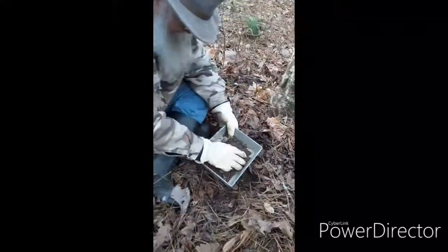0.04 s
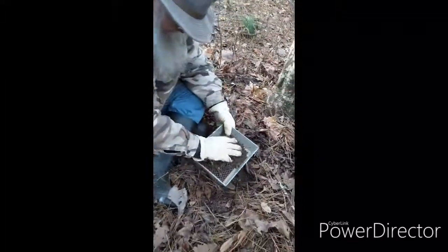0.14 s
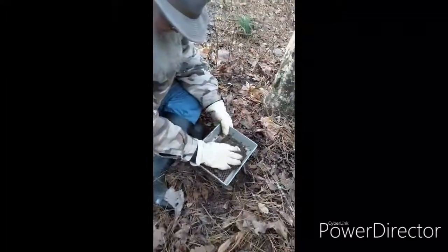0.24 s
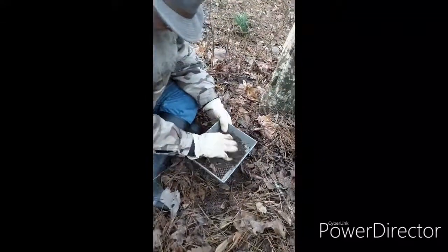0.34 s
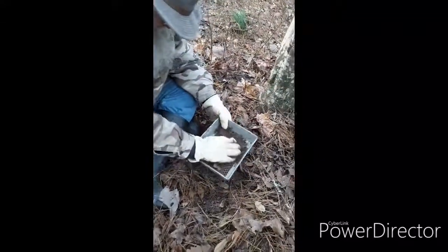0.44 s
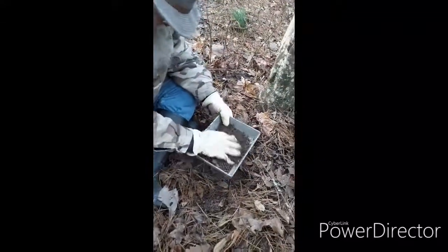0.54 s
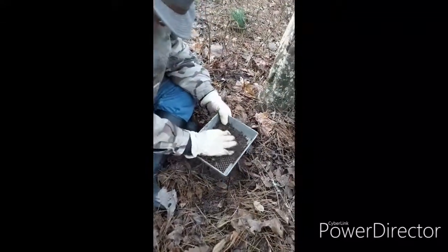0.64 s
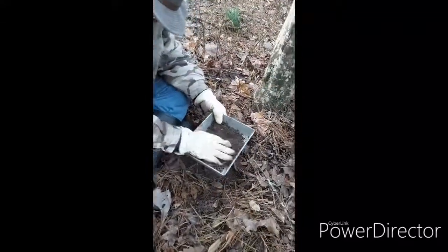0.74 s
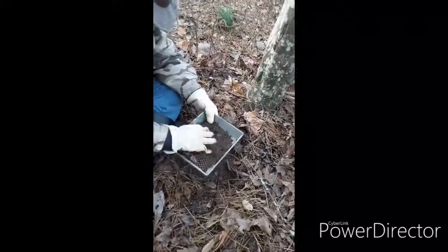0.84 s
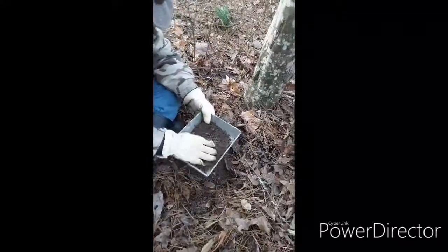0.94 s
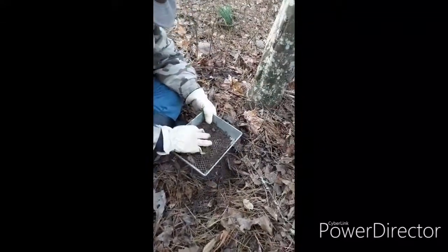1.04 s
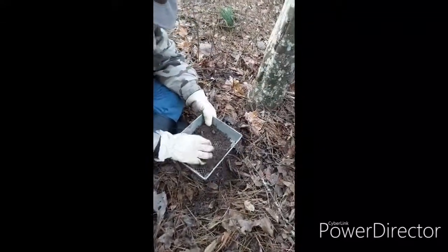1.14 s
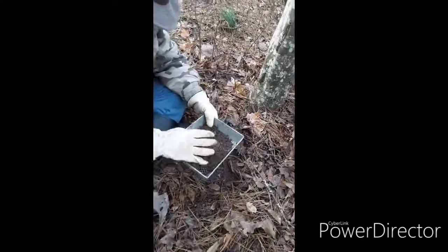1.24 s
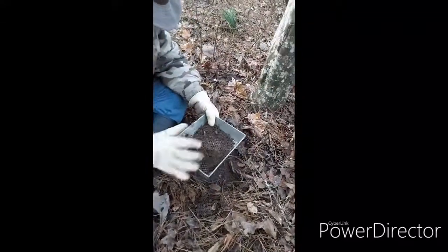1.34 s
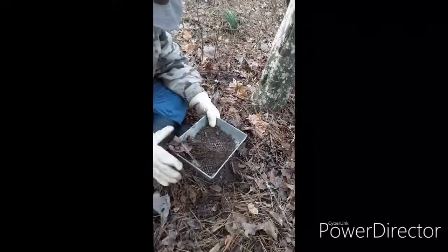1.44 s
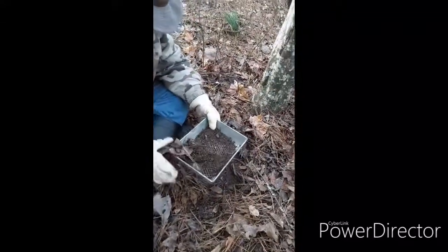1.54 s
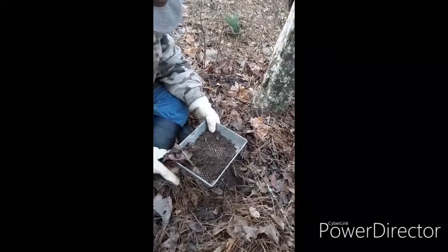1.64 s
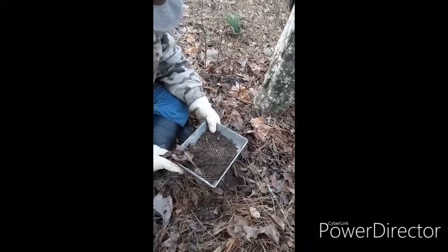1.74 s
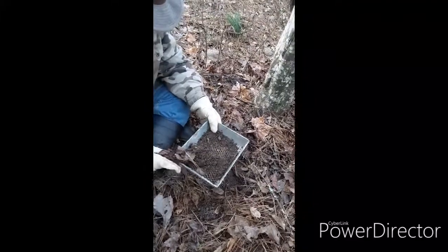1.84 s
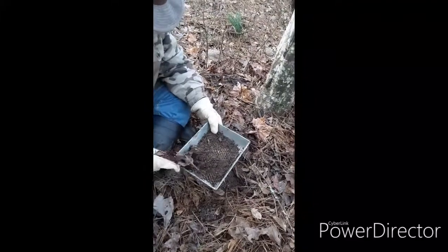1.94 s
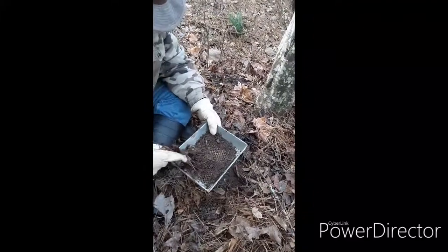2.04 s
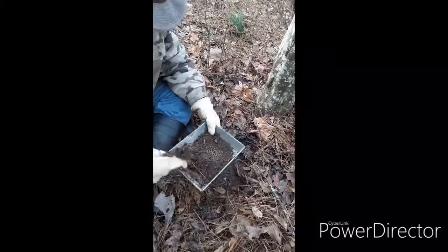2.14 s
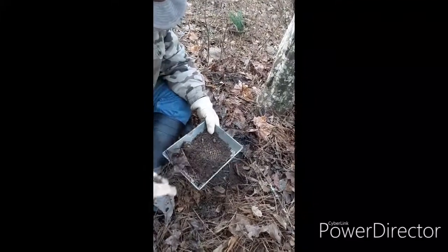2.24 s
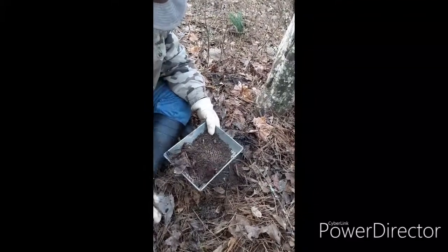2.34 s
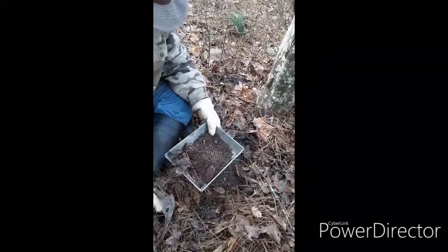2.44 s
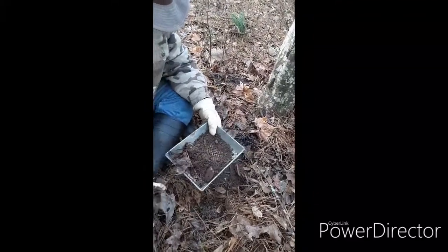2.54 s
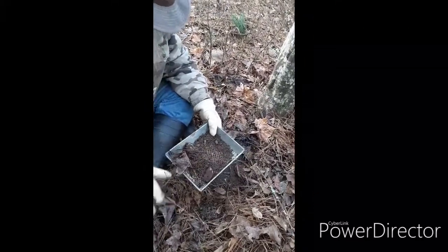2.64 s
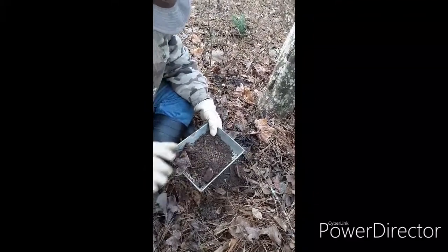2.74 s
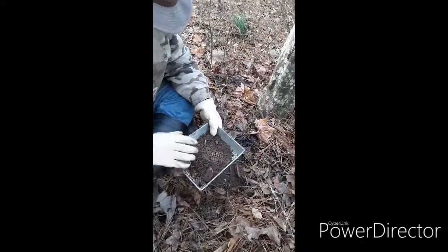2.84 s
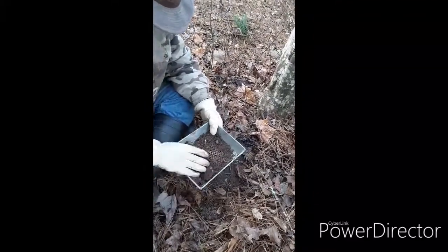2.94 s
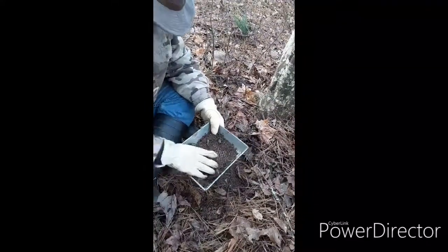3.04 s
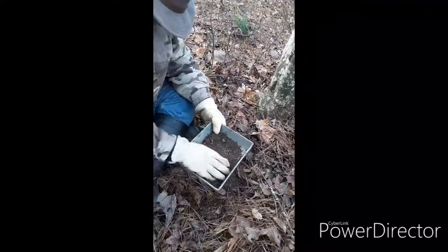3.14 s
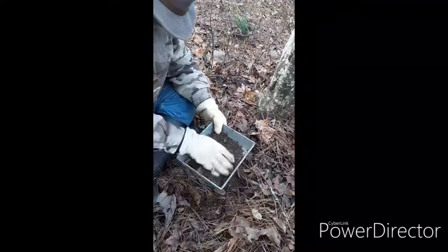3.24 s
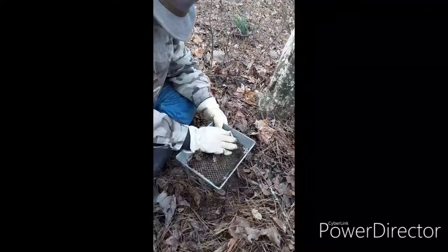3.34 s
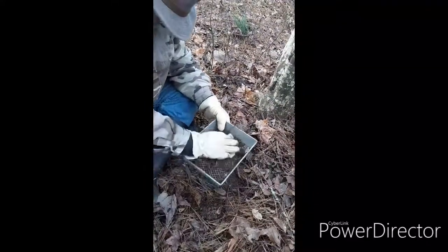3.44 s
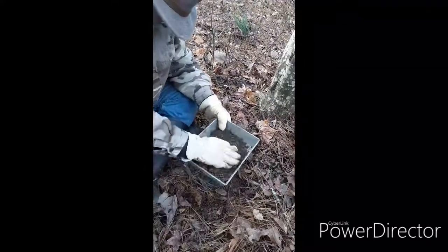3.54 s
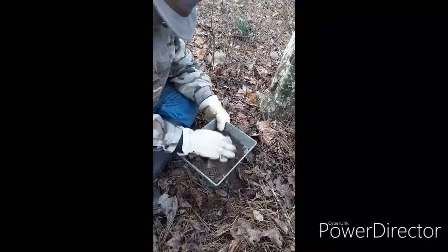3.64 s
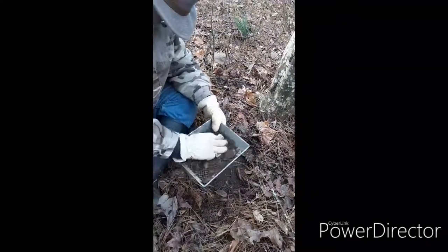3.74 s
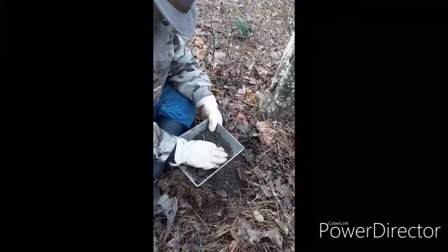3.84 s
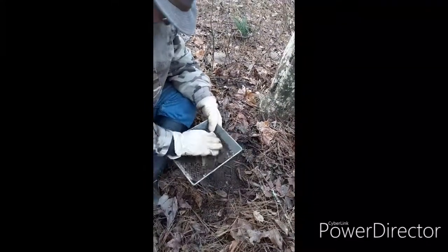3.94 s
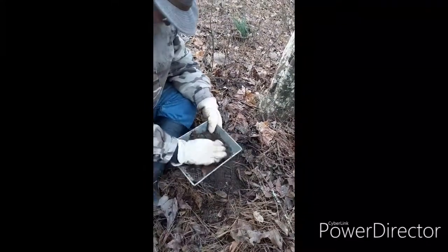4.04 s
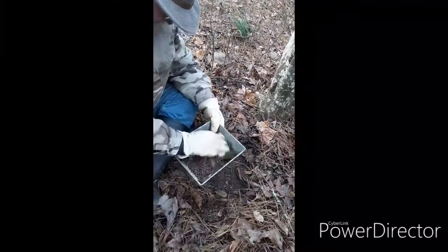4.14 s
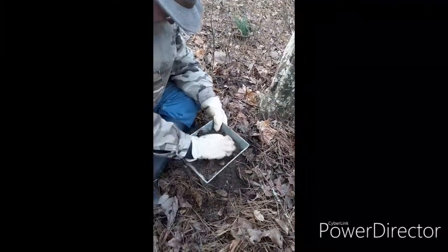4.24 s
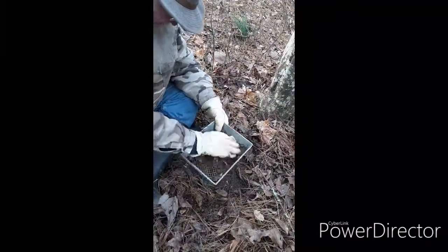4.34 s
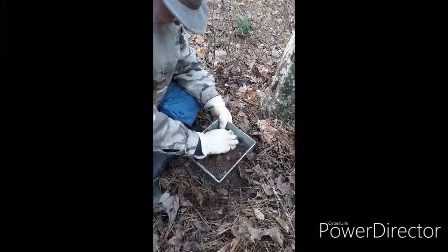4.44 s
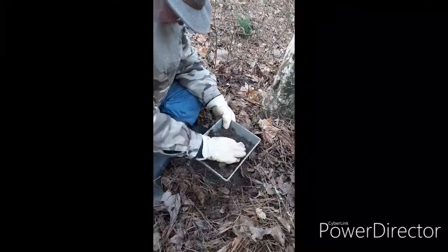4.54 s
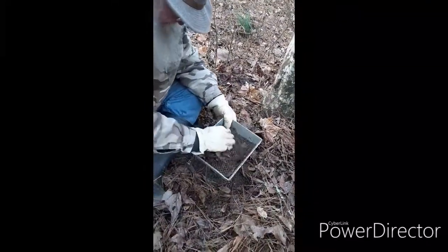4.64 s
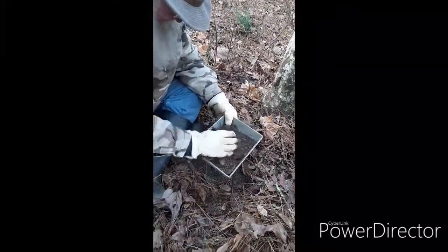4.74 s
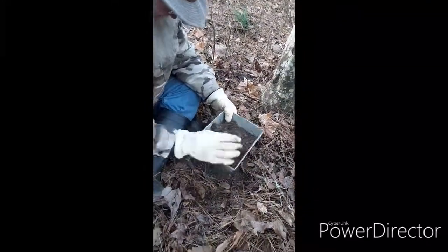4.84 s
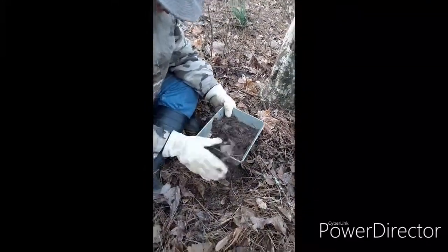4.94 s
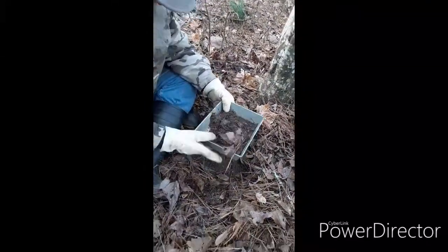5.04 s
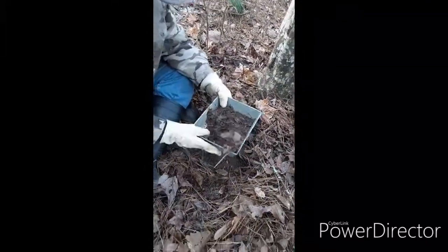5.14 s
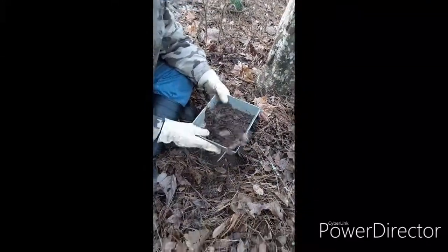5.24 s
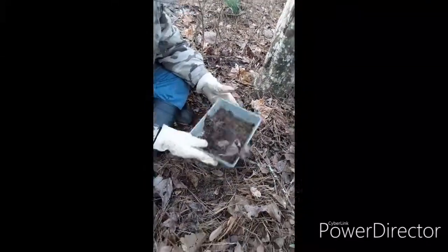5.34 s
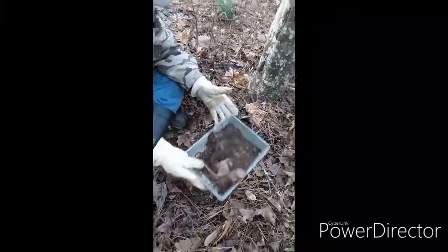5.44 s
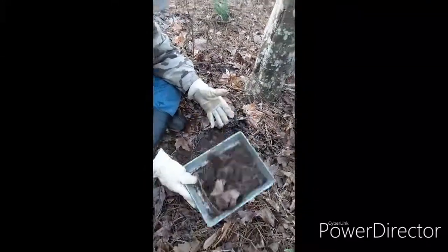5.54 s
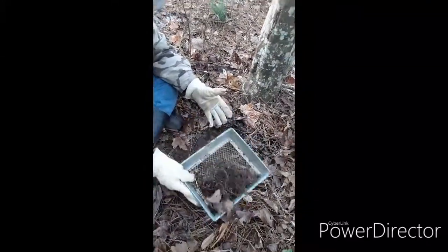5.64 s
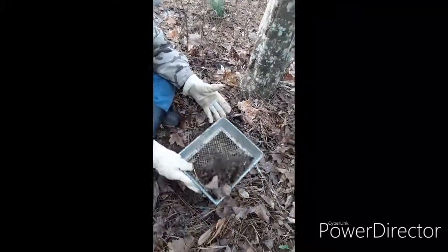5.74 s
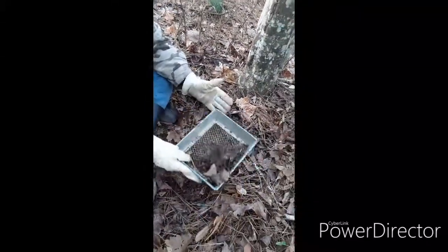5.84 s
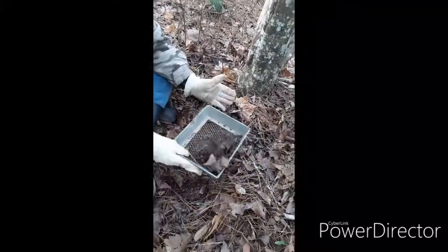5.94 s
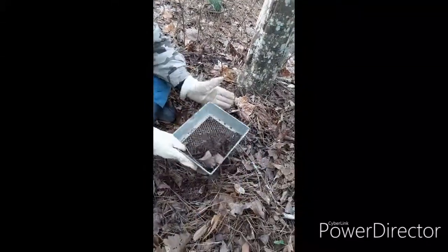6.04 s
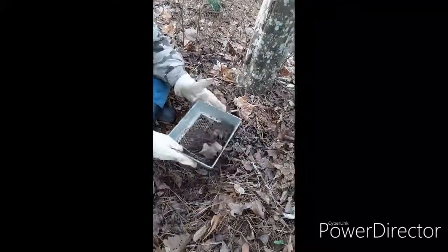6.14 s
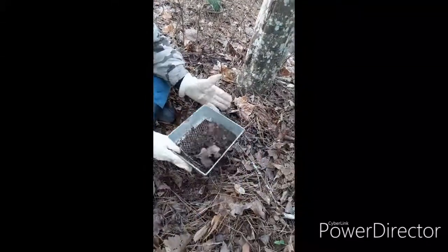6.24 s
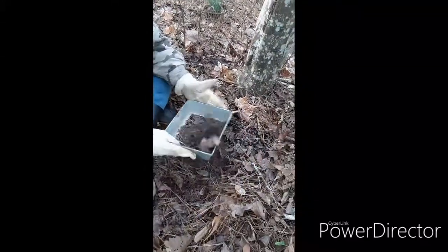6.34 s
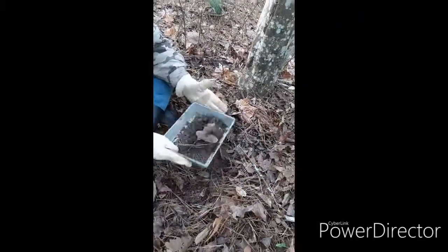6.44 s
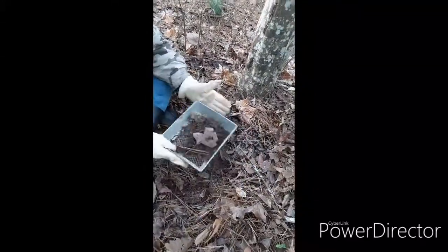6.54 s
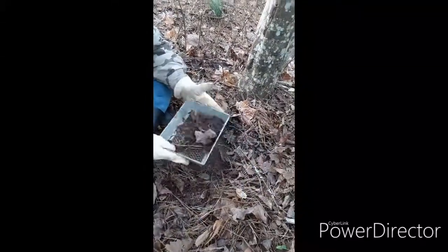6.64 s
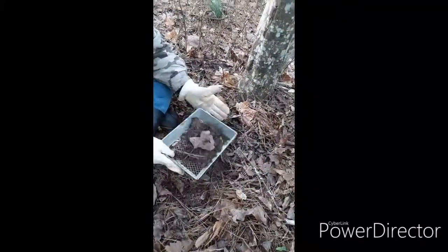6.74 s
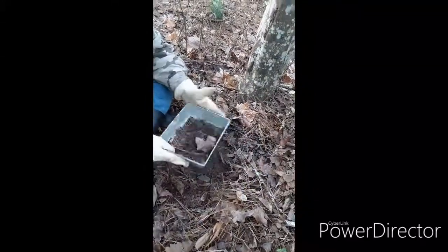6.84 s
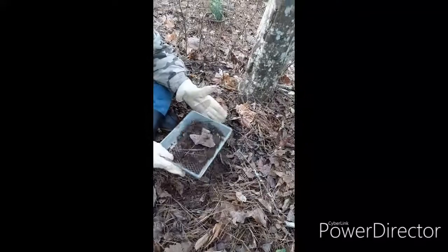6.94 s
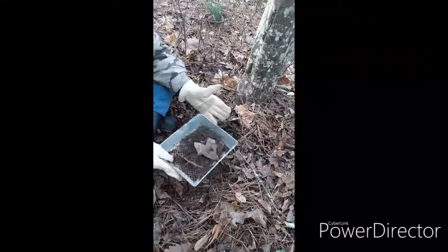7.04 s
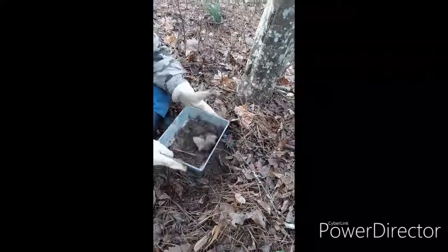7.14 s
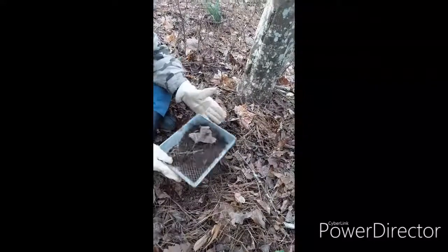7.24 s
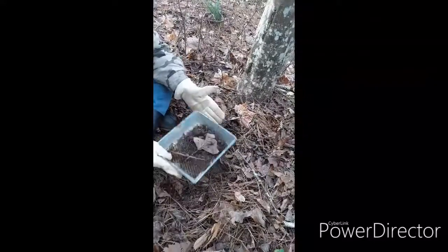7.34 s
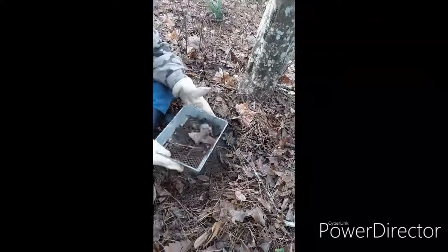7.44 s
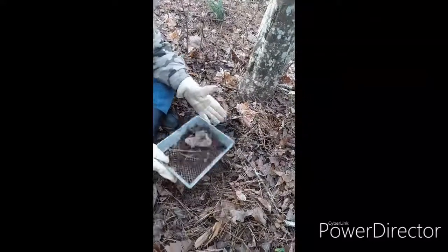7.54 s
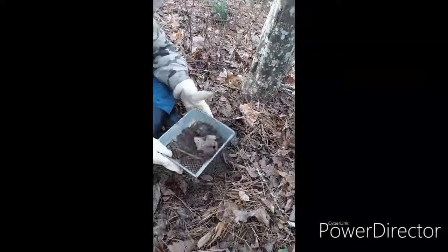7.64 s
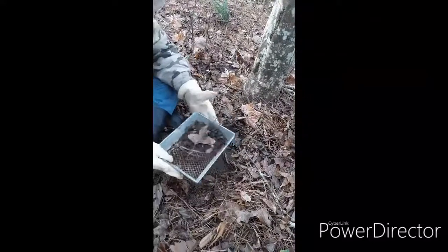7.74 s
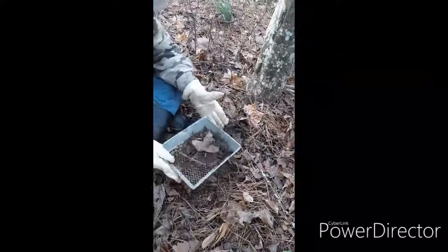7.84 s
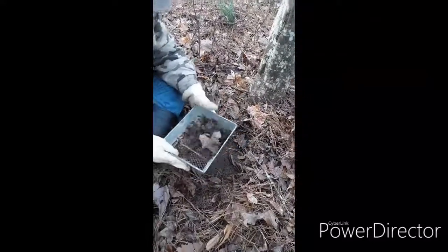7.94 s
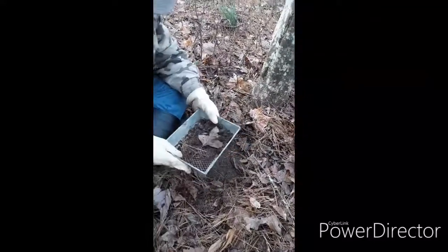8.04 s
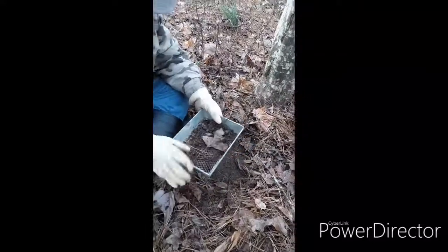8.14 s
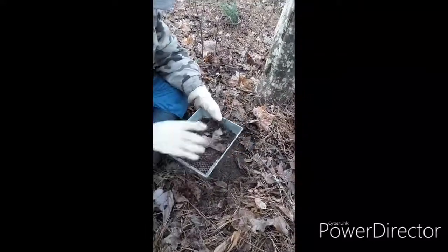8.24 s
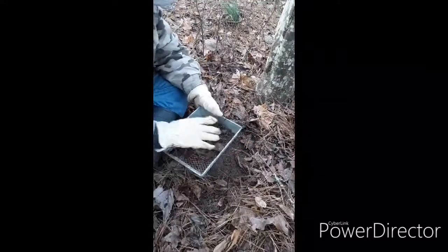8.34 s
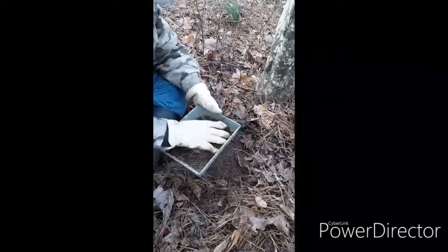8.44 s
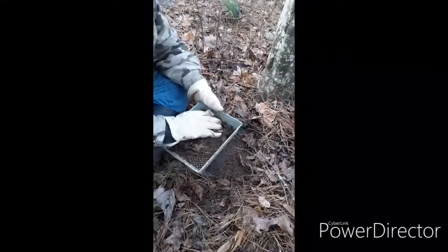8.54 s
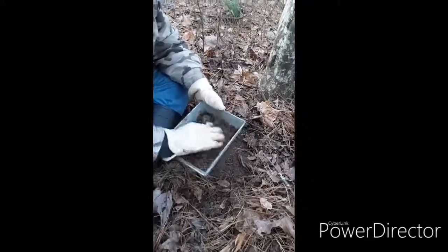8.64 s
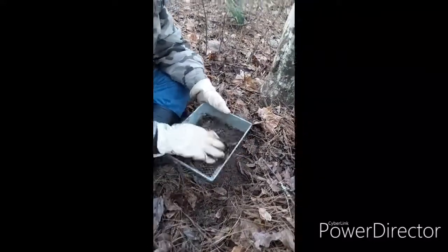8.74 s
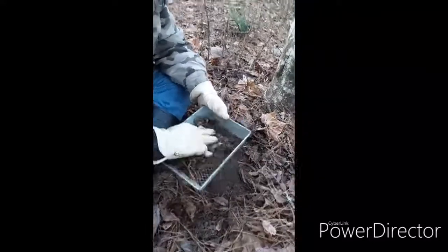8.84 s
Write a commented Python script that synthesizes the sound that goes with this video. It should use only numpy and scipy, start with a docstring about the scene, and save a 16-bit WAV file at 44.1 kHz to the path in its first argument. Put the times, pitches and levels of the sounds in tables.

```python
"""Sieving soil in the woods

A gloved hand rubs soil through a wire-mesh sieve over leaf litter; then the sieve is swung against
the other palm, six sharp knocks and a softer one, each ringing the damped modes of its pan.
Crumbs trickle through the mesh and tick on the ground, dry leaves snap, and the bubbles of a brook
babble faintly, louder on the left. Two closely spaced microphones listen."""
import sys
import numpy as np
from scipy import signal
from scipy.fft import rfft, irfft, next_fast_len
from scipy.io import wavfile
from scipy.ndimage import map_coordinates

SR = 44100
rng = np.random.default_rng(int(sys.argv[2]) if len(sys.argv) > 2 else 0)


def log_audio(samples):
    """Write samples as a 16-bit WAV file to the path given in sys.argv[1]."""
    # one column per channel
    frames = np.atleast_2d(samples).T
    # limit to full scale, then quantise
    limited = np.clip(frames, -1, 1)
    pcm = np.round(limited * 32767).astype(np.int16)
    wavfile.write(sys.argv[1], SR, pcm)


N = 391916
T = np.arange(N) / SR
HIT_T = np.arange(SR // 4) / SR  # time axis of a one-shot


def amp(db):
    """Decibels to gain."""
    return 10 ** (np.asarray(db) / 20)


def unit(x):
    """Scale to rms 1."""
    return x / np.sqrt(np.mean(x ** 2) + 1e-20)


def burst(x):
    """Scale a one-shot to the energy of 10 ms at rms 1."""
    return unit(x) * np.sqrt(SR / 100 / x.shape[-1])


def along(points, hz):
    """Read a curve of (freq_hz, value) points on a log frequency axis."""
    freqs, values = np.transpose(points)
    return np.interp(np.log(hz + 1), np.log(freqs + 1), values)


def wobble(rate):
    """A smooth random curve, rate knots a second."""
    return map_coordinates(rng.standard_normal(int(N * rate / SR) + 4), [T * rate])


def swells(rows):
    """Bell envelopes from rows of peak_s, level_db, then half_width_s or both rise_s and fall_s."""
    t = T[::40]
    power = sum(amp(2 * db) * np.exp(-((t - s) / np.where(t < s, widths[0], widths[-1])) ** 2)
                for s, db, *widths in rows)
    return np.interp(T, t, np.sqrt(power))


def add(track, start_s, sound):
    """Mix a sound into a track."""
    room = track[..., round(start_s * SR):][..., :sound.shape[-1]]
    room += sound[..., :room.shape[-1]]


def filtered(x, response):
    """Apply a complex frequency response."""
    size = next_fast_len(x.shape[-1] + 4096)
    return irfft(rfft(x, size) * response(np.fft.rfftfreq(size, 1 / SR)), size)[..., :x.shape[-1]]


def high_pass(x, hz, order):
    """Roll off the bass under hz."""
    return signal.sosfilt(signal.butter(order, hz, "high", fs=SR, output="sos"), x)


# Stereo image of close sounds: freq_hz, left_right_coherence
NEAR_IMAGE = [(150, 0.75), (400, 0.88), (1000, 0.74), (2500, 0.47), (6000, 0.014), (14000, 0.02)]

def spread(pair, eq, image=NEAR_IMAGE):
    """EQ two unrelated signals and blend them, as mid and side, into partly alike left and right."""
    def response(hz):
        angle = np.arccos(np.clip(along(image, hz), -1, 1)) / 2
        return amp(along(eq, hz)) * [np.cos(angle), np.sin(angle)]
    mid, side = filtered(pair, response)
    return np.array([mid + side, mid - side])


def placed(x, lag_samples, shade_db):
    """Delay the left against the right and shade it, mostly in the treble; negatives swap sides."""
    sides = np.array([[1], [-1]]) / 2
    def response(hz):
        shade = shade_db * along([(200, 0.24), (2200, 0.19), (4000, 0.68), (8000, 0.8)], hz)
        return amp(-sides * shade) * np.exp(-2j * np.pi * hz / SR * lag_samples * sides)
    return filtered(x, response)


def crumbs(rate, scatter_db, hiss):
    """Tiny impacts of different sizes over the hiss of fine dust."""
    hits = (rng.random(N) < rate / SR) * amp(scatter_db * np.clip(rng.standard_normal(N), -3, 2))
    return unit(hits * rng.uniform(-0.93, 1, (2, N))) + hiss * rng.standard_normal((2, N))


def pebbles(rate, scatter_db, cycles):
    """Coarse grains, each pinging for a few cycles at a pitch of its own."""
    when, pitch, size, angle = rng.random((int(rate * N / SR), 4)).T[:, :, None]
    t, ratio = HIT_T[:SR // 80], 12 ** pitch
    turns = 800 * ratio * t
    strength = amp(scatter_db * size ** 5) * np.sqrt(ratio)
    pings = strength * np.exp(-turns / cycles) * np.sin(2 * np.pi * turns)
    index = (when * (N - len(t))).astype(int) + np.arange(len(t))
    shares = np.cos(2 * np.pi * angle), np.sin(2 * np.pi * angle)
    return unit(np.array([np.bincount(index.ravel(), (pings * share).ravel(), N) for share in shares]))


def crunch(eq, attack_s, t60_s, tail_db, tail_t60_s):
    """A clump of tiny impacts and the thin spray after it, as noise with a two-stage decay."""
    decay = amp(-60 * HIT_T / t60_s) + amp(tail_db - 60 * HIT_T / tail_t60_s)
    envelope = decay * (1 - np.exp(-HIT_T / attack_s))
    return burst(spread(envelope * rng.standard_normal((2, len(HIT_T))), eq))


# Level ride of the soil running through the mesh: time_s, level_db
SOIL_FLOW = [(0, -46), (.25, -47.5), (.45, -43.5), (1.1, -46), (1.35, -51.5), (1.8, -49), (2.2, -53.5),
             (2.95, -52.5), (3.05, -49.5), (3.3, -48.5), (3.5, -45), (3.67, -53.5), (4.05, -43),
             (4.39, -48), (4.7, -46), (4.87, -51.5), (5.05, -49), (5.45, -51), (5.95, -47.5), (6.13, -50.5),
             (6.5, -47.5), (8.35, -55), (8.89, -37)]
# The load spills as the sieve tilts: peak_s, level_db, half_width_s
TILT_SPILLS = [(5.674, -46, 0.058), (5.937, -65, 0.015), (6.484, -45, .011), (6.507, -47, 0.028),
               (7.727, -43, 0.015), (7.787, -43, 0.0088), (8.045, -45, 0.063)]
# Tone of the falling soil: freq_hz, gain_db
TRICKLE_EQ = [(150, -9), (350, -6), (550, 2.5), (1200, -4), (1850, 1), (2500, -1.5), (4300, 2),
              (5400, -0.5), (6500, 4), (8200, -4.5), (12000, -3.5), (15500, -7.5)]

def trickle():
    """Crumbs patter through the mesh, more loudly whenever the load slides."""
    flow = amp(np.interp(T, *np.transpose(SOIL_FLOW)))
    slides = []
    for s, *_, slide_db in PALM_KNOCKS:
        slides.append((s - 0.027, slide_db - 51, 0.055))  # each swing slides the load up to the wall
        slides.append((s + 0.034, slide_db - 49.5, 0.077))  # then it spills through the mesh
    level = np.hypot(flow, amp(3) * swells(slides + TILT_SPILLS)) * amp(1.6 * wobble(45))
    grains = crumbs(rate=5000, scatter_db=3.5, hiss=.75)
    grains += .55 * pebbles(rate=800, scatter_db=5, cycles=6)
    return placed(level * unit(spread(grains, TRICKLE_EQ)), lag_samples=0, shade_db=4)


# Tone of the water's wash: freq_hz, gain_db
WATER_EQ = [(15, -55), (25, -48), (86, -1), (169, -10), (290, -8.5), (523, -4.5), (666, -8), (782, -3),
            (1660, -3), (1800, 2.5), (2120, -3), (2770, -5), (5430, -19.5), (6550, -15), (8130, -21.5),
            (15500, -32)]
# Stereo image of the distant water: freq_hz, left_right_coherence
FAR_IMAGE = [(60, 0.93), (300, 0.94), (800, 0.69), (2000, 0.78), (6000, 0.79), (14000, 0.28)]

def brook(rate, pitch_hz, cycles, bubble_db):
    """A bed of washing water with small bubbles that rise in pitch as they ring."""
    bubbles, t = np.zeros(N), HIT_T[:SR // 16]
    for when, pitch, strength in rng.random((int(rate * N / SR), 3)):
        hz = pitch_hz * 1.713 ** np.arcsin(2 * pitch - 1)  # most are of middling size
        age = t * hz / cycles
        chirp = np.sin(2 * np.pi * hz * t * (1 + 0.0075 * age))
        add(bubbles, when * N / SR, amp(8.6 * strength ** 3) * hz * age * np.exp(-age) * chirp)
    wash = unit(spread(rng.standard_normal((2, N)), WATER_EQ, FAR_IMAGE)) * amp(wobble(8.6) - 51.5)
    return placed(wash + amp(bubble_db) * unit(bubbles) + plops(), lag_samples=11.7, shade_db=-9)


# Single pushes and light sweeps of the glove: peak_s, level_db, rise_s, fall_s, dust_offset_db
GLOVE_STROKES = [(.195, -49, .03, 0.019, -9), (.325, -53, .02, 0.022, 3), (.875, -46.5, 0.037, 0.046, -10),
                 (1.025, -49, 0.014, 0.033, 2), (1.11, -49, 0.031, 0.02, -17), (1.215, -48, .025, .02, -8),
                 (2.215, -52, 0.028, 0.015, 4), (3.01, -51, 0.0089, 0.041, 6.5),
                 (3.18, -53.5, 0.027, 0.093, 7.5), (3.363, -39.5, 0.024, 0.044, 5),
                 (3.598, -43, 0.066, 0.025, 4.5), (3.752, -40.5, 0.033, 0.026, 1.5),
                 (3.885, -43, 0.046, 0.026, 4), (3.906, -36, 0.013, 0.011, -0.5),
                 (4.02, -43.5, 0.046, 0.044, -3), (4.242, -40, 0.032, 0.014, 4),
                 (4.35, -46, 0.035, 0.013, 7.5), (4.455, -42.5, 0.032, 0.029, 2.5),
                 (4.595, -40.5, 0.028, 0.029, 5), (4.725, -42.5, 0.067, 0.056, 3),
                 (5.02, -49.5, 0.012, 0.015, 7), (5.22, -58.5, 0.082, 0.093, 5),
                 (5.72, -53, 0.088, 0.22, 9), (5.933, -47, 0.015, 0.038, 7), (7.96, -46, 0.022, 0.029, 0),
                 (8.49, -46, .015, 0.017, 0), (8.598, -39.5, 0.04, 0.025, 3),
                 (8.775, -39.5, 0.061, 0.029, 5), (8.874, -33, 0.026, 0.04, 0)]
# The wires sing as the glove drags: peak_s, level_db, half_width_s
WIRE_SINGS = [(1.19, -52, 0.14), (4.153, -46, 0.01), (4.60, -46, 0.035), (5.68, -49, 0.065)]
# The gloves take a new grip: peak_s, level_db, half_width_s
GLOVE_GRIPS = [(.05, -57, 0.38), (3.75, -48, 0.04), (5.08, -56, 0.031), (5.25, -55, 0.4),
               (6.27, -53, 0.084), (8.02, -55, 0.17), (8.78, -54, 0.28)]
# Tone of soil scraped over wire: freq_hz, gain_db
SCRAPE_EQ = [(60, -38), (110, -22), (250, -15), (520, 1), (1150, -9.5), (1800, -3), (2300, -5), (4200, -1),
             (5600, -1.5), (6400, 2), (8200, -7.5), (12500, -6), (17000, -10.5)]
# Dull tone of glove and sleeve: freq_hz, gain_db
CLOTH_EQ = [(25, -45), (55, 1), (110, 0.5), (300, 6.5), (550, 7.5), (900, 3), (2500, -1), (8000, -50)]

def rubbing(scrub_start_s=0.566, scrub_period_s=0.1098, dust_hz=7000., wire_hz=1860, sleeve_db=-14.5):
    """The glove grinds soil over the wires, catching and slipping, and its cloth brushes the frame."""
    # an early run of quick, even strokes to and fro
    scrubs = [(scrub_start_s + k * scrub_period_s, -46, 0.022, 0.022, 0) for k in range(6)]
    strokes = scrubs + GLOVE_STROKES
    pushes = swells([(s, db, rise, fall) for s, db, rise, fall, _ in strokes])
    puffs = swells([(s, db + dust_db, rise, fall) for s, db, rise, fall, dust_db in strokes])
    grains = crumbs(rate=5000, scatter_db=4, hiss=.65)
    grains += .85 * pebbles(rate=1400, scatter_db=5, cycles=6)
    soil = unit(spread(grains, SCRAPE_EQ))
    dust = filtered(soil, lambda hz: hz ** 6 / (hz ** 6 + dust_hz ** 6))
    scrape = ((soil - dust) * pushes + dust * puffs) * amp(2.4 + 1.05 * wobble(100))
    wires = np.sin(2 * np.pi * wire_hz * T + 1.7 * wobble(80)) * amp(2.5 * wobble(40) - 3)
    cloth = unit(spread(rng.standard_normal((2, N)), CLOTH_EQ)) * amp(2.8 * wobble(40))
    cloth_level = np.hypot(amp(sleeve_db) * pushes, swells(GLOVE_GRIPS))
    return placed(scrape + wires * swells(WIRE_SINGS) + cloth * cloth_level, lag_samples=1, shade_db=5.5)


# The brook's larger bubbles: start_s, level_db, pitch_hz, glide_octaves_per_s
BIG_BUBBLES = [(.438, -39.5, 790, 10), (1.196, -43.5, 540, 10), (1.321, -43, 987, 13),
               (1.339, -47.5, 484, 2), (2.132, -44, 737, 9), (2.141, -36.5, 1340, 16),
               (2.311, -46.5, 570, 7), (2.717, -47, 1040, -3), (2.941, -41.5, 925, 3), (3.106, -44, 920, 5),
               (3.162, -39, 890, -7), (3.246, -47, 430, 2), (8.39, -49, 745, 4), (8.465, -44.5, 497, 14)]

def plops(rise_s=0.0038):
    """Now and then a larger bubble stands out of the babble, gliding in pitch as it rings."""
    out, t = np.zeros(N), HIT_T[:SR // 12]
    age = t / rise_s
    for s, db, hz, glide in BIG_BUBBLES:
        phase = 2 * np.pi * np.cumsum(hz * 2 ** (glide * t)) / SR
        add(out, s, amp(db) * age * np.exp(1 - age) * np.sin(phase))
    return out


# Dry leaves and twigs snapping: start_s, level_db, tilt_db_per_octave
LEAF_SNAPS = [(0.482, -28, -0.5), (0.489, -46, 9), (0.926, -32, -4), (2.222, -34, -3), (2.538, -36, -1),
              (2.699, -33.5, 1), (2.722, -38, 3), (2.807, -33, 1), (2.826, -31.5, 2), (2.863, -30.5, 3),
              (2.978, -29.5, 5), (3.845, -36, 0), (4.14, -27.5, 3), (4.361, -31, -1), (4.941, -37, 1),
              (4.975, -30.5, -3), (8.165, -34, -2.5)]
# Crisp tone of leaf litter: freq_hz, gain_db
LEAF_EQ = [(300, -43), (1500, -2), (4000, 0.5), (6500, 9), (8500, 0), (12000, -2), (15500, -6)]

def leaves(crumple_after_s=0.017, crumple_db=-18, half_width_s=0.023):
    """Brittle leaves and twigs give way with small dry snaps and crumple on."""
    crumples = swells([(s + crumple_after_s, db + crumple_db, half_width_s) for s, db, _ in LEAF_SNAPS])
    out = crumples * unit(spread(crumbs(rate=6300, scatter_db=-3, hiss=0.93), LEAF_EQ))
    for s, db, tilt in LEAF_SNAPS:
        eq = [(hz, gain_db + tilt * np.log2(hz)) for hz, gain_db in LEAF_EQ]
        add(out, s, amp(db - 9) * crunch(eq, attack_s=.0003, t60_s=.018, tail_db=-24, tail_t60_s=.06))
    return placed(out, lag_samples=0, shade_db=7.5)


def ring(modes, attack_s, scatter_db=0):
    """Damped modes start together from rest; the grip detunes them a little each time."""
    hz, db, t60_s = np.transpose(modes)[:, :, None]
    strength, detune = rng.standard_normal((2, len(modes), 1))
    waves = np.sin(2 * np.pi * hz * (1 + .015 * detune) * HIT_T)
    decays = amp(db + scatter_db * strength - 60 * HIT_T / t60_s)
    return np.sum(decays * waves, axis=0) * (1 - np.exp(-HIT_T / attack_s))


# Hand-damped modes of the sieve's pan: pitch_hz, level_db, t60_s
PAN_MODES = [(116, -1.5, 0.069), (143, -1, 0.033), (197.4, 4.5, 0.082), (280, 3, 0.025), (329.5, 3, 0.044),
             (420, 7, 0.028), (482, 4.5, 0.037), (537.5, 1, 0.076), (641, 6.5, 0.036), (740, 4, 0.034),
             (954, 3, 0.019), (1152, 6.5, 0.015), (1290, 7, 0.022), (1490, -3, 0.018), (1620, 3, 0.017),
             (2202, 3.5, 0.034), (2560, 0, 0.03), (2940, 5.5, 0.03), (3660, -12, 0.042), (4660, 9.5, 0.012),
             (5060, -9, 0.023)]

def pan_ring(low_hz, high_hz, attack_s, centre_hz=1000, focus=0):
    """One register of the pan; the place of the blow favours modes near centre_hz by focus dB/octave."""
    modes = [(hz, db - focus * abs(np.log2(hz / centre_hz)), t60_s)
             for hz, db, t60_s in PAN_MODES if low_hz < hz <= high_hz]
    return burst(ring(modes, attack_s))


# Tone of grit slapping the pan: freq_hz, gain_db
GRIT_EQ = [(200, -10), (900, 6), (1800, 4.5), (2600, 0.5), (3200, -2.5), (4600, 4), (5500, -8.5),
           (6500, 1.5), (8200, -14), (15500, -11)]

def blow(thud_db, thud_hz, body_db, body_hz, clack_db, clack_hz, grit_db):
    """One contact: the pan thuds, rings hollow and clacks, and the grit slaps against it."""
    grit = crunch(GRIT_EQ, attack_s=0.0029, t60_s=0.033, tail_db=-26, tail_t60_s=0.33)
    thud = amp(thud_db) * pan_ring(240, 380, attack_s=.0015, centre_hz=thud_hz, focus=13)
    body = amp(body_db) * pan_ring(380, 850, attack_s=0.00087, centre_hz=body_hz, focus=11)
    clack = amp(clack_db) * pan_ring(850, 1900, attack_s=0.00078, centre_hz=clack_hz, focus=41)
    slap = amp(grit_db) * (grit + .5 * pan_ring(1900, 9000, attack_s=0.00028))
    return high_pass(thud + body + clack + slap, 0.51 * thud_hz, order=3)  # higher thud, less bass


# Taps on the frame: start_s, level_db, clack_hz, grit_offset_db, thud_offset_db
FRAME_TAPS = [(.872, -51, 1600, 6, -22), (1.099, -48.5, 1290, 0, -5), (3.396, -45, 1340, 0, 0.5),
              (3.412, -42.5, 1260, 1, -9), (4.237, -45.5, 950, -12, -21), (5.012, -58, 990, -6, -7),
              (5.646, -53.5, 1600, 13.5, -18), (6.18, -36, 1330, 10, -22), (6.1879, -24.5, 1340, -4, -23),
              (6.245, -54, 851, 13.5, 1), (6.398, -59, 1540, 23, -8), (6.4658, -40.5, 1270, 11, -20),
              (7.978, -49, 1260, -15, -5), (8.015, -43, 1270, -16, -4), (8.793, -56.5, 880, -1, 18.5)]

def taps(thud_hz=303, body_hz=630, body_db=3):
    """Fingers and clods tap the frame and set the pan ringing."""
    out = np.zeros((2, N))
    for s, db, clack_hz, grit_db, thud_db in FRAME_TAPS:
        add(out, s, blow(db + thud_db, thud_hz, db + body_db, body_hz, db, clack_hz, db + grit_db))
    return out


# Crumbs landing: start_s, level_db, pitch_hz
CRUMB_TICKS = [(1.611, -39, 2830), (1.739, -35, 4430), (1.8363, -40, 6250), (1.8504, -40, 6460),
               (2.059, -38, 3420), (2.1914, -38, 5970), (2.365, -38, 2670), (2.6489, -41, 6170),
               (2.7392, -39, 6260), (3.6601, -36, 6950), (5.2345, -34.5, 6500), (6.1195, -38, 6350),
               (7.02, -32.5, 4260), (8.0537, -30, 5900), (8.4193, -36.5, 3930)]

def ticks(trim_db=-9.5, faint_per_s=4, faint_db=-44, low_hz=800, high_hz=6000):
    """Single crumbs land on twigs and leaves, which ring briefly; fainter ones fall at random."""
    out = np.zeros((2, N))
    faint = [(when * N / SR, faint_db, low_hz * (high_hz / low_hz) ** pitch)
             for when, pitch in rng.random((int(faint_per_s * N / SR), 2))]
    for s, db, hz in CRUMB_TICKS + faint:
        resonance = [(hz / 4, -36), (hz * .75, -12), (hz, 0), (hz * 1.25, -12), (hz * 3, -32)]
        tick = crunch(resonance, attack_s=.0002, t60_s=0.035, tail_db=-26, tail_t60_s=.04)
        add(out, s, amp(db + trim_db) * tick)
    return out


# Twangs of the mesh: start_s, level_db
MESH_TWANGS = [(4.338, -48.5), (5.647, -41), (7.975, -42), (8.018, -48)]
# Modes of the mesh: pitch_hz, level_db, t60_s
MESH_MODES = [(634, 4.5, 0.2), (620, -23, 0.077), (800, -18, 0.045), (1302, 2.5, 0.095), (1665, 3, 0.082),
              (1990, 6, 0.08)]

def twangs():
    """The wire mesh twangs as the load shifts."""
    out = np.zeros((2, N))
    for s, db in MESH_TWANGS:
        add(out, s, amp(db) * ring(MESH_MODES, attack_s=.002, scatter_db=1.5))
    return out


# The sieve hits the palm: start_s, level_db, boom_db, thud_db, body_db, clack_db, crack_db,
# thud_hz, body_hz, clack_hz, slide_db. Boom to crack sit relative to level_db; slide feeds the trickle.
PALM_KNOCKS = [(6.1853, -24.5, -23, -1, 2.5, -2, -3, 430, 623, 1300, -11),
               (6.4356, -23, -11, 4, 2, -7, 1, 324, 415, 1240, 3.5),
               (6.688, -27, -15, -17, -7.5, -3, -1.5, 340, 485, 1010, 0.5),
               (6.9319, -20.5, -12, -14, 0.5, -2, 0, 316, 590, 1170, 5.5),
               (7.2175, -22, -9, -4, -7.5, -0.5, 0.5, 296, 633, 1010, 5.5),
               (7.4869, -23, -9, -2, -9.5, -4.5, -4, 290, 560, 1050, 5),
               (7.7258, -33.5, -12, -7.5, -5, 0.5, -16, 278, 680, 1270, 2)]
# Tone of the wall's dry crack: freq_hz, gain_db
CRACK_EQ = [(300, -9), (1000, -1), (2000, -4), (3000, 2), (4700, 4), (5600, -1), (6600, -4), (8200, -12.5),
            (15500, -13)]

def knocks(lead_s=0.0035, lead_db=-12):
    """The pan booms and cracks on the palm at the end of each swing."""
    out = np.zeros((2, N))
    for (s, db, boom_db, thud_db, body_db, clack_db, crack_db,
         thud_hz, body_hz, clack_hz, _) in PALM_KNOCKS:
        contact = blow(thud_db, thud_hz, body_db, body_hz, clack_db, clack_hz, grit_db=-2)
        boom = pan_ring(0, 240, attack_s=0.00082)
        crack = crunch(CRACK_EQ, attack_s=.0002, t60_s=.011, tail_db=-30, tail_t60_s=.04)
        add(out, s, amp(db) * (contact + amp(boom_db) * boom + amp(crack_db - 3) * crack))
        # the front of the sliding load reaches the wall a moment before its bulk
        first_grit = crunch(GRIT_EQ, attack_s=0.0059, t60_s=0.036, tail_db=-28, tail_t60_s=0.046)
        add(out, s - lead_s, amp(db + lead_db) * first_grit)
    return out


def sieve_hits(echo_db=-21, echo_t60_s=0.12):
    """Knocks, taps and twangs on one bus; ground and trunks scatter a brief answer."""
    hits = high_pass(knocks() + taps() + twangs(), 97, order=2)  # the deepest bass under the hits is rolled off
    tail = rng.standard_normal((2, len(HIT_T))) * amp(-60 * HIT_T / echo_t60_s) * (HIT_T > .004)
    echo = signal.fftconvolve(hits, tail / np.linalg.norm(tail[0]), axes=1)[:, :N]
    return placed(hits + amp(echo_db) * echo, lag_samples=-2.5, shade_db=4)


def scene():
    """The sieve at work in front of the quiet wood."""
    foreground = trickle() + rubbing() + sieve_hits() + leaves() + ticks()
    return foreground + brook(rate=110, pitch_hz=841.6, cycles=5.9, bubble_db=-56)


def record(dry):
    """Round off the hardest peaks, thin the deepest bass and cut the very top."""
    ceiling, low_cut_hz, top_hz = .7, 40, 15750
    soft = dry / (1 + np.abs(dry / ceiling) ** 4) ** .25
    return filtered(soft, lambda hz: hz / np.hypot(hz, low_cut_hz) * (hz < top_hz))


dry = scene()
out = record(dry)
log_audio(out)
```